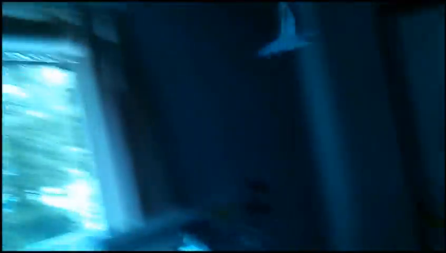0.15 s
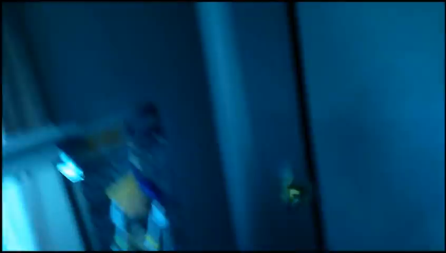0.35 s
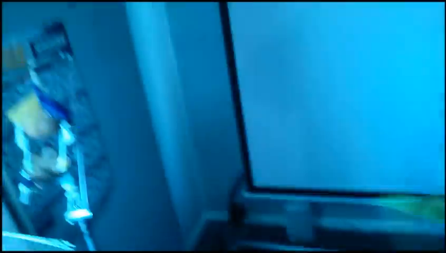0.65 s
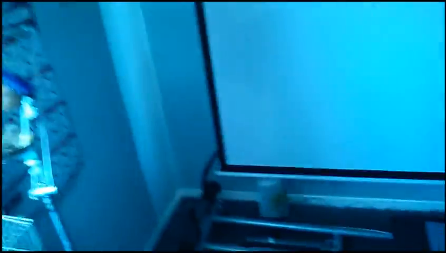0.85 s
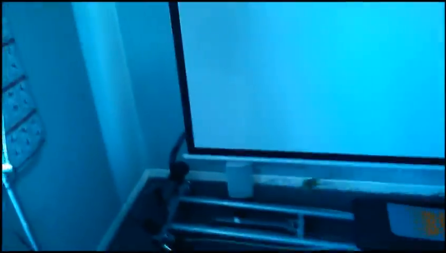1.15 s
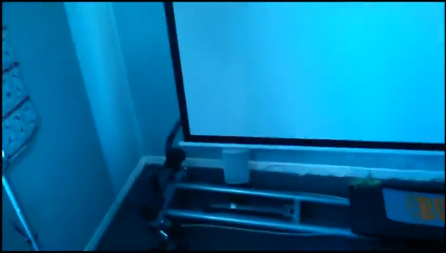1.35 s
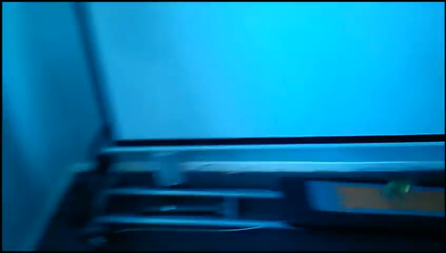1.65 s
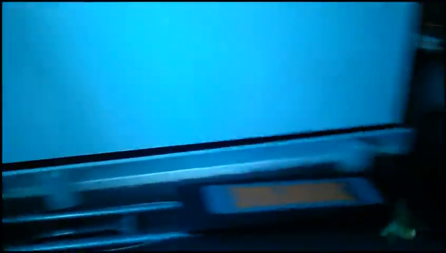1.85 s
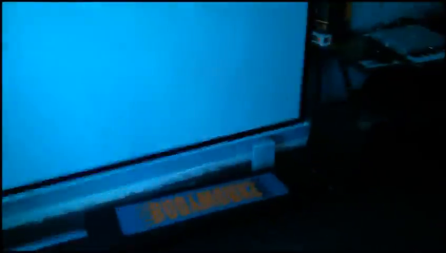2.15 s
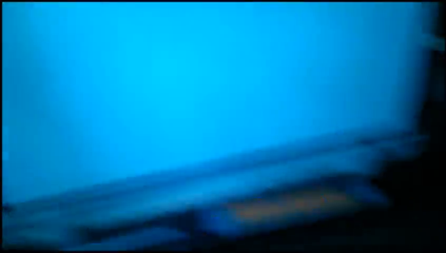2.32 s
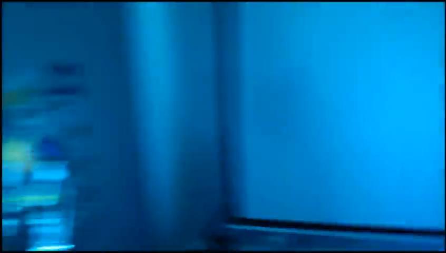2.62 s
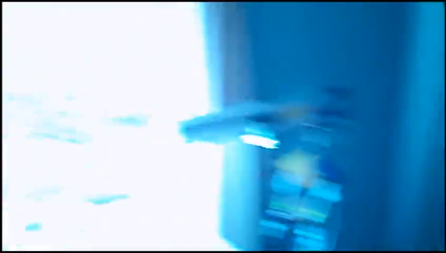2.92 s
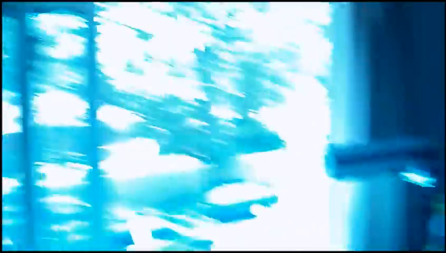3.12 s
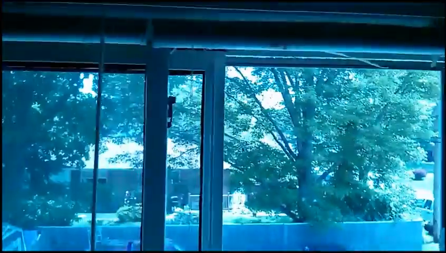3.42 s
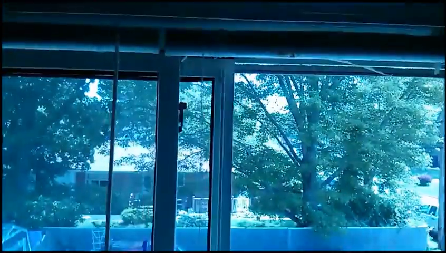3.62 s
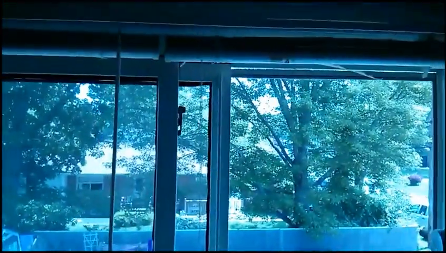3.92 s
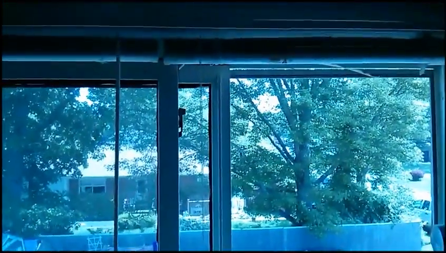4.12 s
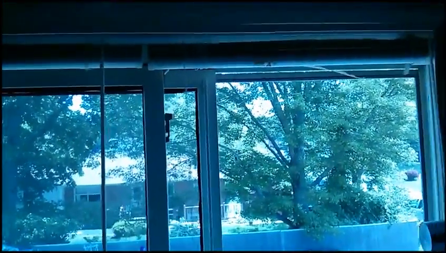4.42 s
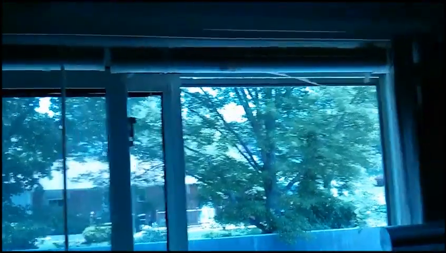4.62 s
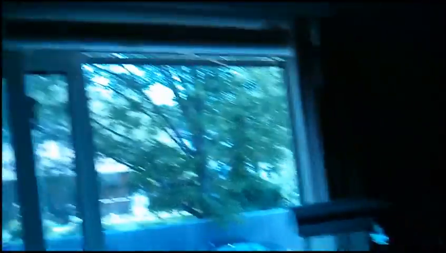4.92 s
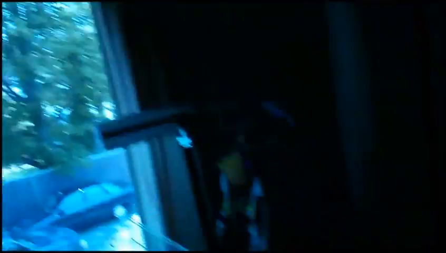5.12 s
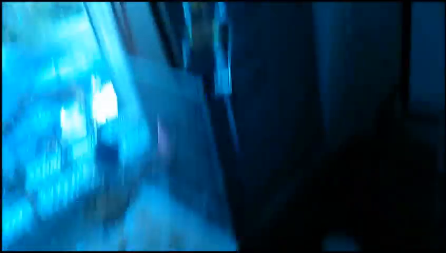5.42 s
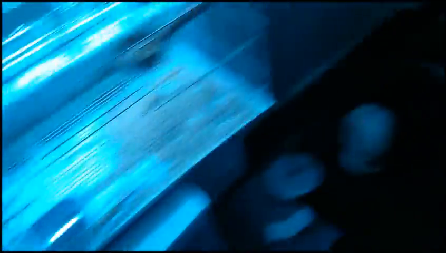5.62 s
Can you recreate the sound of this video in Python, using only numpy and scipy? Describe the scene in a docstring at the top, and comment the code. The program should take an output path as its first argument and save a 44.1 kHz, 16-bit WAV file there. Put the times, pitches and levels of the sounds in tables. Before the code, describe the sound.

A small parrot flies round a living room, heard by one nearby microphone. From 0 to 0.5 s, crisp feathery wingbeats, about sixteen per second, pass very close with soft air puffs; around 0.3 s a small metal part tinkles brightly. Fainter flutter continues to 1.4 s. A loud, bright, rasping squawk comes at 0.7 s, followed by weaker, roomier ones at 1.4, 1.6, 2.2, 3.1 and 4.2 s, each about a fifth of a second. Light brushing rustles appear around 2.7-2.9 s. From 3.3 s soft wing strokes and hollow knocks resume, with crisp flaps at 4.7-4.9 s and softer beats to 5.5 s; a short scrape falls near 5.7 s. Faint distant peeps are scattered early, then two-note whistles from 3.5 to 5.4 s. A low mains hum runs faintly at 0.1-1 s, more clearly at 1.9-2.8, 3.7-4.6 and from 5.5 s, over quiet room rumble and hiss.

```python
"""Wing strokes flutter past first: a small parrot flies round a living room and brushes something metal.
Feather noise and air pulses form the strokes; decaying modes form the metal's tinkle.
Six squawks, harmonic tones turned harsh by period doubling, sound from different distances.
A far bird whistles gliding sine pairs and single peeps. Brushes rustle as short noise strokes, and a hollow
resonance knocks, often in step with the wings, over a machine's on-and-off hum and shaped room noise."""
import sys
import numpy as np
from scipy import signal
from scipy.fft import rfft, irfft, next_fast_len
from scipy.io import wavfile

SR = 44100
rng = np.random.default_rng(int(sys.argv[2]) if len(sys.argv) > 2 else 0)


def wav_record(signal):
    """Record a signal, one row per channel, as 16-bit PCM in the file named by sys.argv[1]."""
    frames = np.transpose(np.atleast_2d(signal))
    bounded = np.clip(frames, -1, 1)
    # unit amplitude maps onto the largest positive 16-bit level
    quanta = np.round(bounded * 32767).astype(np.int16)
    wavfile.write(sys.argv[1], SR, quanta)


N = 254456
TIME = np.arange(N) / SR


def from_db(db):
    """Logarithmic level: decibels become an amplitude ratio."""
    return 10 ** (np.asarray(db) / 20)


def rms_one(x):
    """Normalisation: mean-square power becomes one."""
    return x / np.sqrt(np.mean(x ** 2) + 1e-20)


def along(rows, at):
    """Linear interpolation: read each later column at places along the first."""
    first, *columns = np.transpose(rows)
    return [np.interp(at, np.sort(first), column) for column in columns]


def at_hz(points, hz):
    """Logarithmic frequency scale: read a spectrum between its points."""
    points = np.array(points)
    return np.interp(np.log(np.maximum(hz, 1)), np.log(points[:, 0]), points[:, 1])


def colour(x, spectrum):
    """Linear filtering: multiply the Fourier spectrum by a smooth gain."""
    size = next_fast_len(len(x))
    gain = from_db(at_hz(spectrum, np.fft.rfftfreq(size, 1 / SR)))
    return irfft(rfft(x, size) * gain, size)[:len(x)]


def noise(spectrum):
    """Spectral shaping: white noise is coloured and set to unit power."""
    return rms_one(colour(rng.standard_normal(N), spectrum))


def wobble(hz, count=N):
    """Low-pass random fluctuation, slower than about the given rate, with unit power."""
    lowpass = signal.butter(2, hz, fs=SR, output="sos")
    settling = SR // 4
    return rms_one(signal.sosfilt(lowpass, rng.standard_normal(count + settling))[settling:])


def add(track, s, sound):
    """Superposition: sum a sound into a track from a given second."""
    start = int(np.clip(s * SR, 0, N - 1))
    track[start:start + len(sound)] += sound[:N - start]


def burst(t, swell, decay):
    """Transient envelope: linear onset, then exponential decay (both in seconds)."""
    return np.clip(t / swell, 0, 1) * np.exp(-np.maximum(t - swell, 0) / decay)


def ring(t, hz, t60):
    """Damped resonance: one mode loses 60 dB in t60 seconds."""
    return np.sin(2 * np.pi * hz * t) * np.exp(-np.log(1000) * t / t60)


# reverberation time of the room: (frequency [Hz], t60 [s])
REVERBERATION = [(100, 0.74), (1000, 0.38), (3000, 0.32), (8000, 0.42), (16000, 0.25)]


def room(x, wet_db, early_db=8.0, early_s=0.027, gap_s=0.0026):
    """Reverberation: direct sound plus reflections that decay at their own rate in each band."""
    t, tail = TIME[:SR // 2], 0
    # reflections arrive ever more densely
    density = np.clip((t / .06) ** 2, .01, 1)
    edges = np.geomspace(50, 18000, 9)
    for low, high in zip(edges, edges[1:]):
        echoes = rng.choice([-1, 1], len(t)) * (rng.random(len(t)) < density) / np.sqrt(density)
        bandpass = signal.butter(2, [low, high], "band", fs=SR, output="sos")
        band = signal.sosfilt(bandpass, echoes * (t > gap_s))
        t60 = at_hz(REVERBERATION, np.sqrt(low * high))
        tail = tail + band * np.exp(-np.log(1000) * t / t60)
    # extra energy in the early reflections
    tail = tail * (1 + from_db(early_db) * np.exp(-(t / (2 * early_s)) ** 2))
    wet = from_db(wet_db)
    reverberant = signal.fftconvolve(x, tail / np.linalg.norm(tail))[:len(x)]
    # keeps the total power about the same
    return (x + wet * reverberant) / np.hypot(1, wet)


# bursts of even wingbeats: (first beat [s], last beat [s], nominal rate [beats/s], then relative levels:
# feather swish [dB], feather snap [dB], air puff [dB], hollow ring [dB], and fade over the burst [dB])
FLIGHT_BURSTS = [(0.01, 0.075, 16, -20, -21.5, -36, -42, -1.5),
                 (0.132, 0.196, 16, -24.5, -19.5, -39, -41, 1),
                 (0.318, 0.5, 16, -27.5, -33, -29, -43, 16.5),
                 (0.555, 0.669, 18, -50.5, -48, -37.5, -44.5, -0.5),
                 (0.732, 1.03, 20, -39.5, -27.5, -45.5, -40.5, 3),
                 (1.14, 1.381, 16.5, -49.5, -37, -64, -51, 9.5),
                 (3.262, 3.435, 17, -65, -65, -57, -41.5, -1),
                 (3.495, 4.059, 16, -66.5, -60.5, -50.5, -41, -4.5),
                 (4.151, 4.665, 15.5, -55, -43, -48, -47, 5), (4.726, 4.789, 15, -23, -25, -34.5, -51, 4),
                 (4.867, 4.938, 14, -30.5, -28, -40, -58, 14),
                 (5.003, 5.521, 15.5, -56, -49.5, -41, -34, 4.5)]
SWISH_SPREAD_DB, PUFF_SPREAD_DB, RING_SPREAD_DB = 1, 2.5, 3   # from one beat to the next


def wingbeats():
    """Periodic excitation with random strength: rows (time [s], swish, snap, puff, ring [dB])."""
    spread_db = [SWISH_SPREAD_DB, SWISH_SPREAD_DB, PUFF_SPREAD_DB, RING_SPREAD_DB]
    beats = []
    for first, last, rate, *levels_db, fade_db in FLIGHT_BURSTS:
        intervals = int(round((last - first) * rate))
        for share in np.linspace(0, 1, intervals + 1):
            chance_db = rng.standard_normal(4) * spread_db
            beat_db = levels_db + chance_db - fade_db * share
            beats.append((first + share * (last - first), *beat_db))
    return beats


# friction spectrum of feathers, also the hiss of the short noise strokes:
# (frequency [Hz], relative density [dB per Hz])
FEATHER_SPECTRUM = [(290, -61.5), (500, -13), (613, -3.5), (750, -20), (919, -1), (1090, -11.5),
                    (1380, -19.5), (1950, -5), (2850, -23), (2980, -14), (6510, -2.5), (8580, 3),
                    (14700, -4), (16000, 8.5)]


def wings(beats, swish_db=1.0, puff_db=5.0, puff_hz=92, puff_lag=.02, puff_width=0.011, grain_db=3.5):
    """Friction and air displacement: feathers snap open and rub, then push a soft puff of air."""
    t, swish, puffs = TIME[:SR // 5], np.zeros(N), np.zeros(N)
    snap = burst(t, swell=.001, decay=.0045)
    rub = burst(t, swell=.006, decay=0.029)
    chances = rng.standard_normal((len(beats), 2))
    for (s, feather_db, snap_db, air_db, _), (size, turn) in zip(beats, chances):
        add(swish, s - .001, from_db(snap_db) * snap + from_db(feather_db + swish_db) * rub)
        # each puff has its own pitch and phase
        swing = np.sin(2 * np.pi * puff_hz * np.exp(0.22 * size) * (t - puff_lag) + turn)
        pulse = np.exp(-.5 * ((t - puff_lag) / puff_width) ** 2) * np.minimum(t / .005, 1)
        add(puffs, s, from_db(air_db + puff_db) * swing * pulse)
    barbs = rng.standard_normal(N) * from_db(grain_db * wobble(1000))
    near = room(swish * rms_one(colour(barbs, FEATHER_SPECTRUM)), wet_db=-7, early_db=3)
    return near + room(puffs, wet_db=-13.5)


# progress at the start, first crest, main crest and end of a squawk: [%]
SQUAWK_STAGES = [0, 20, 70, 100]
# nominal pitch through every squawk: (progress [%], frequency [Hz])
PITCH_COURSE = [(0, 2000), (9, 2350), (21, 2740), (29, 1950), (37, 2170), (58, 1470), (70, 1780),
                (79, 1520), (88, 2600), (93, 1900), (100, 1750)]
# effort at the start, first crest and end (before the release), against the main crest
OPENING_DB, BODY_DB, ENDING_DB = -37.5, -10, -8.5
RELEASE, RELEASE_DB = 10, 6.5   # the voice dies over the last part (progress %)
# the voice turns harsh, purer, harsh (progress %)
BREAKS_AT, CLEARS_AT, BREAKS_AGAIN_AT, CHANGEOVER = 24.5, 55, 79.15, 5
# level of the odd partials, and their fade over the opening
OPENING_ODD_DB, HARSH_ODD_DB, PURE_ODD_DB, ODD_FADE_DB = 12, -2, -32, 26
OPENING_RASP, BODY_RASP, ARCH_RASP, ENDING_RASP = .1, .45, .27, 0.49   # 0-1


def squawk_course(progress):
    """Vocal regimes: clear opening, harsh body, purer arch at full effort, harsh ending."""
    pitch, = along(PITCH_COURSE, progress)
    effort_db = np.interp(progress, SQUAWK_STAGES, [OPENING_DB, BODY_DB, 0, ENDING_DB])
    released = np.clip(1 - (SQUAWK_STAGES[-1] - progress) / RELEASE, 0, 1)
    effort_db = effort_db - RELEASE_DB * released
    changes = (BREAKS_AT, CLEARS_AT, BREAKS_AGAIN_AT)
    broken, cleared, ending = (np.clip((progress - at) / CHANGEOVER + .5, 0, 1) for at in changes)
    opening, body, arch = 1 - broken, broken - cleared, cleared - ending
    odd_db = opening * (OPENING_ODD_DB - ODD_FADE_DB * progress / BREAKS_AT)
    odd_db = odd_db + (body + ending) * HARSH_ODD_DB + arch * PURE_ODD_DB
    rasp = opening * OPENING_RASP + body * BODY_RASP + arch * ARCH_RASP + ending * ENDING_RASP
    return pitch, effort_db, odd_db, rasp


# resonance of throat and beak: (frequency [Hz], gain [dB])
VOCAL_TRACT = [(700, -37), (1200, -18), (1650, -10), (2600, 4), (3300, 0.5), (4300, -1.5), (5400, -1.5),
               (6700, -12.5), (7700, -8.5), (8900, -1.5), (10500, -18), (15000, -16)]
BRIGHTENING = 0.36   # the overtones' slope follows effort (dB per octave for each dB)


def squawk(marks, treble_db, flutter=0.28, slope_db=-7.0, hiss_db=-7.0, rattle_hz=430):
    """Period doubling in the syrinx: odd partials appear and a rattle tears the lines into strands."""
    t = np.arange(marks[0], marks[-1], 1 / SR)
    count = len(t)
    pitch, effort_db, odd_db, rasp = squawk_course(np.interp(t, marks, SQUAWK_STAGES))
    rattle = np.sin(2 * np.pi * np.cumsum(rattle_hz * (1 + .4 * wobble(120, count))) / SR)
    chaos = .08 * wobble(110, count) + .12 * wobble(800, count) + .08 * rattle
    phase = 2 * np.pi * np.cumsum(pitch * (1 + .016 * wobble(70, count) + rasp * chaos)) / SR
    voice, power = 0, 0
    for k in range(1, 9):
        # partials slope from the second upward; each flickers on its own
        fall_db = (slope_db + treble_db + BRIGHTENING * effort_db) * np.log2(max(k, 2) / 2)
        partial_db = fall_db + odd_db * (k % 2) + 2.68 * wobble(120, count)
        gain = from_db(partial_db) * (k * pitch < SR / 2)
        voice, power = voice + gain * np.sin(k * phase), power + gain ** 2
    # the rattle also chops the airflow
    chop = 1 + flutter * wobble(240, count) + 0.37 * rasp * rattle
    hiss = from_db(hiss_db + treble_db) * (rasp + 0.061) * rng.standard_normal(count)
    source = (voice * chop * np.sqrt(2 / power) + hiss) * from_db(effort_db)
    return colour(np.pad(source, (0, SR // 2)), VOCAL_TRACT)


# squawks: (start [s], first crest [s], main crest [s], end [s], relative level [dB],
# treble: overtone slope [dB per octave] and hiss [dB], reverberant against direct [dB])
SQUAWK_CALLS = [(0.717, 0.739, 0.843, 0.92, -13, 6.5, -7.5), (1.363, 1.385, 1.495, 1.56, -27, -9, 4),
                (1.564, 1.582, 1.688, 1.774, -23.5, -1.5, 0.5), (2.235, 2.25, 2.368, 2.427, -20.5, 1, 2),
                (3.075, 3.093, 3.212, 3.285, -25.5, -7.5, 2.5),
                (4.231, 4.244, 4.367, 4.434, -25.5, -5, 2.5)]


def squawks():
    """Distance cues: each call has its own level, treble and reverberant share."""
    out = np.zeros(N)
    for *marks, level_db, treble_db, room_db in SQUAWK_CALLS:
        call = room(squawk(np.sort(marks), treble_db), room_db)
        add(out, marks[0], from_db(level_db) * call)
    return out


# the far bird's two-note calls: (time [s], relative level [dB])
TWO_NOTE_CALLS = [(3.455, -59.5), (3.775, -56), (4.098, -56.5), (4.678, -61), (4.991, -57.5),
                  (5.402, -62.5)]
# the notes of a call: (delay [s], length [s], start pitch [Hz], end pitch [Hz], relative level [dB])
CALL_NOTES = [(0, 0.062, 2443, 2746, -1.5), (0.044, 0.0485, 3703, 3680, 2)]
# its single peeps: (time [s], centre pitch [Hz], relative level [dB])
SINGLE_PEEPS = [(0.475, 5870, -50), (0.604, 1994, -60), (1.168, 1990, -52), (1.301, 2430, -54.5),
                (1.902, 2346, -58.5), (2.7, 2020, -58.5)]
PEEP_S, PEEP_RISE = 0.021, 0.036   # length; glide to either side of the pitch, as a share


def whistles():
    """Frequency glide: short near-pure tones, in pairs or single, heard mostly by way of the walls."""
    out = np.zeros(N)
    notes = []
    for s, call_db in TWO_NOTE_CALLS:
        for delay, length, start_hz, end_hz, db in CALL_NOTES:
            notes.append((s + delay, length, start_hz, end_hz, call_db + db))
    for s, hz, db in SINGLE_PEEPS:
        notes.append((s, PEEP_S, hz * (1 - PEEP_RISE), hz * (1 + PEEP_RISE), db))
    for s, length, start_hz, end_hz, level_db in notes:
        count = int(length * SR)
        pitch = np.linspace(start_hz, end_hz, count) + 55 * wobble(250, count)
        tone = np.sin(2 * np.pi * np.cumsum(pitch) / SR)
        add(out, s, from_db(level_db + 5.5) * tone * signal.windows.tukey(count, .5))
    return room(out, wet_db=9.5, early_db=-5.5)


# light touches on metal: (time [s], relative level [dB], brightness [dB per octave])
METAL_TOUCHES = [(0.282, -37.5, -2.5), (0.349, -38, 23), (0.356, -44.5, 14.5)]
# modes of the metal: (frequency [Hz], relative level [dB], t60 [s])
METAL_MODES = [(889, 0.5, 0.13), (1057, -4, 0.093), (4052, -2, .6), (7350, -1, 0.073), (8680, -12.5, 0.15),
               (11070, -41.5, 0.097)]


def metal():
    """Modal vibration: a small metal part tinkles, and a bright touch favours its high modes."""
    t, out = TIME[:SR // 2], np.zeros(N)
    for s, level_db, tilt_db in METAL_TOUCHES:
        for hz, db, t60 in METAL_MODES:
            mode_db = level_db + db + tilt_db * np.log2(hz / 4000)
            add(out, s, from_db(mode_db) * ring(t, hz, t60))
    # it rattles loosely while it rings
    return room(out * (1 + 0.38 * wobble(120)), wet_db=-1)


# short noise strokes (brushes, some wing strokes and a breath of squawk hiss):
# (time [s], relative hiss [dB], relative scrape [dB], swell [s], decay [s])
NOISE_STROKES = [(0.281, -19, -38, 0.0012, 0.015), (1.472, -41.5, -66, 0.0096, 0.022),
                 (2.663, -46.5, -49.5, 0.011, 0.032), (2.811, -49, -36.5, 0.0094, 0.025),
                 (2.825, -32.5, -45.5, 0.017, 0.059), (2.944, -36.5, -67, 0.017, 0.021),
                 (3.683, -51, -56, 0.0009, 0.011), (4.534, -53, -40.5, 0.0051, 0.01),
                 (4.872, -30.5, -66, 0.0057, 0.017), (5.25, -40, -52.5, 0.0071, 0.07),
                 (5.657, -47, -59, 0.0089, 0.017), (5.739, -36, -36, 0.0064, 0.0085)]
# spectrum of the scrape: (frequency [Hz], relative density [dB per Hz])
SCRAPE_SPECTRUM = [(700, -25), (950, -19), (1250, 10.5), (2100, -1.5), (3000, -9.5), (4500, 0), (5600, 6),
                   (7500, -12.5)]


def noise_strokes():
    """Noise transients: brushes, some wing strokes and a breath of squawk hiss, as grainy hiss and scrape."""
    t, hiss, scrape = TIME[:SR // 2], np.zeros(N), np.zeros(N)
    for s, hiss_db, scrape_db, swell, decay in NOISE_STROKES:
        stroke = burst(t, swell, decay)
        add(hiss, s, from_db(hiss_db) * stroke)
        add(scrape, s, from_db(scrape_db) * stroke)
    strokes = hiss * noise(FEATHER_SPECTRUM) + scrape * noise(SCRAPE_SPECTRUM)
    grain = from_db(3.1 * wobble(600))
    return room(strokes * grain, wet_db=-10.5)


# hollow knocks at their own times, loud and soft: (time [s], relative level [dB])
SEPARATE_KNOCKS = [(0.823, -29), (0.91, -32), (1.776, -33), (1.893, -40), (2.466, -35.5), (2.887, -36),
                   (3.324, -33), (4.001, -35), (4.403, -30), (5.011, -42), (5.332, -32)]
# modes of the hollow resonance: (nominal frequency [Hz], nominal level [dB], t60 [s])
HOLLOW_MODES = [(351, -10.5, 0.16), (428.8, 2.5, 0.12), (540, -8, 0.05), (649, -14.5, 0.15),
                (890, -12, 0.066)]


def knocks(beats, level_db=-9.0):
    """Modal excitation: hollow knocks, many in step with the wings, each with its own mix of modes."""
    blows = SEPARATE_KNOCKS + [(s, ring_db) for s, *_, ring_db in beats]
    t, out = TIME[:SR // 4], np.zeros(N)
    chances = rng.standard_normal((len(blows), len(HOLLOW_MODES), 2))
    soft_onset = np.minimum(t / 0.015, 1)
    for (s, blow_db), chance in zip(blows, chances):
        modes = 0
        for (hz, db, t60), (strength, detune) in zip(HOLLOW_MODES, chance):
            modes = modes + from_db(db + 2.2 * strength) * ring(t, hz * 1.06 ** detune, t60)
        add(out, s, from_db(blow_db + level_db) * modes * soft_onset * 2)
    return room(out, wet_db=-10.0)


# runs of the machine: (start [s], end [s], swell [s], relative low hum [dB], relative upper hum [dB])
MACHINE_RUNS = [(0.106, 1.032, 0.096, -63, -45), (1.929, 2.81, 0.095, -40, -44),
                (3.727, 4.603, 0.5, -41, -38.5), (5.497, 5.798, 0.1, -39.5, -36.5)]
HUM_SAG_DB_PER_S, HUM_STOP_S, IDLE_LOW_DB, IDLE_UPPER_DB = 6, 0.043, -57, -76.5


def hum_levels():
    """Amplitude envelope: each run swells, sags and dies back to idle; low and upper hum in dB."""
    low, upper = from_db(IDLE_LOW_DB), from_db(IDLE_UPPER_DB)
    for start, end, swell, low_db, upper_db in MACHINE_RUNS:
        running = np.clip((TIME - start) / swell, 0, 1) * np.exp(-np.maximum(TIME - end, 0) / HUM_STOP_S)
        # the sag passes through the listed level midway
        running = running * from_db(-HUM_SAG_DB_PER_S * (TIME - (start + end) / 2))
        low, upper = low + from_db(low_db) * running, upper + from_db(upper_db) * running
    return 20 * np.log10([low, upper])


def machine(low_hz=119.7, upper_hz=240.2, body_hz=166):
    """Forced vibration: a mains hum swells and stops, with a slight buzz of the housing."""
    low_db, upper_db = hum_levels()
    turn = 2 * np.pi * TIME
    low = from_db(low_db - 4.0) * np.sin(low_hz * turn + 0.16 * wobble(5))
    upper = from_db(upper_db + 2) * np.sin(upper_hz * turn + 0.41 * wobble(8.9))
    housing = from_db(upper_db - 6.5) * np.sin(body_hz * turn + 1.2 * wobble(12))
    buzz = np.sin(920 * turn + wobble(25)) + 0.91 * np.sin(1315 * turn + wobble(25))
    return low + upper + housing + from_db(upper_db - 26.5) * buzz


# course of the background: (time [s], relative rumble [dB], relative hollow murmur [dB])
BACKGROUND_LEVEL = [(0.0, -50.5, -57), (0.5, -47.5, -50.5), (0.9, -43.5, -53.5), (1.14, -53, -56),
                    (1.61, -61, -60), (1.98, -55, -57.5), (2.65, -51.5, -57), (3.13, -60.5, -57.5),
                    (3.91, -52, -54), (4.92, -55.5, -58), (5.37, -58, -52.5), (5.77, -57.5, -58)]
# course of the treble hiss: (time [s], relative level [dB])
HISS_COURSE = [(0.0, -38), (0.21, -45.5), (0.48, -55.5), (0.74, -61), (0.91, -46), (1.3, -63.5),
               (1.64, -56), (1.98, -68), (3.05, -62), (3.41, -66.5), (4.06, -63.5), (4.29, -58),
               (4.98, -62.5), (5.77, -71)]
# spectrum of the low rumble: (frequency [Hz], relative density [dB per Hz])
RUMBLE_SPECTRUM = [(20, -8), (35, -4), (60, 0), (90, 4), (160, -5), (220, -8), (320, -13), (600, -58.5)]
# spectrum of the hollow murmur: (frequency [Hz], relative density [dB per Hz])
MURMUR_SPECTRUM = [(180, -19), (300, -7), (430, 6), (560, -8), (760, -15), (930, -6), (1120, -21),
                   (1320, -21), (1700, -22), (3000, -44.5)]
# spectrum of the fine hiss: (frequency [Hz], relative density [dB per Hz])
HISS_SPECTRUM = [(900, -3.5), (2100, -2), (2700, -0.5), (3000, -11.5), (3500, -5.5), (4100, 2.5),
                 (6500, 1.5), (8500, 1), (11000, -1), (16000, 5.5)]
RUMBLE_DB, MURMUR_DB, HISS_DB = 4, 2, 5.5   # added to the courses


def background():
    """Stationary noise under slow envelopes: low rumble, hollow room murmur and fine hiss."""
    rumble_db, murmur_db = along(BACKGROUND_LEVEL, TIME)
    hiss_db, = along(HISS_COURSE, TIME)
    rumble = from_db(rumble_db + RUMBLE_DB) * noise(RUMBLE_SPECTRUM)
    murmur = from_db(murmur_db + MURMUR_DB) * noise(MURMUR_SPECTRUM)
    hiss = from_db(hiss_db + HISS_DB + 1.2 * wobble(26)) * noise(HISS_SPECTRUM)
    return rumble + murmur + hiss


def scene():
    """Superposition: all the pressures add at one microphone."""
    beats = wingbeats()
    birds = wings(beats) + squawks() + whistles()
    transients = metal() + noise_strokes() + knocks(beats)
    return (birds + transients + machine() + background())[None]


CUTOFF_HZ = 15850


def record(dry, bass_hz=22, treble_hz=14500):
    """Band limiting: the microphone rolls off at both ends and the top is cut steeply."""
    rolloff = signal.butter(2, [bass_hz, treble_hz], "band", fs=SR, output="sos")
    steep = signal.ellip(10, .2, 70, CUTOFF_HZ, fs=SR, output="sos")   # ripple and stopband in dB
    return signal.sosfilt(steep, signal.sosfilt(rolloff, dry))


dry = scene()
out = record(dry)
wav_record(out)
```